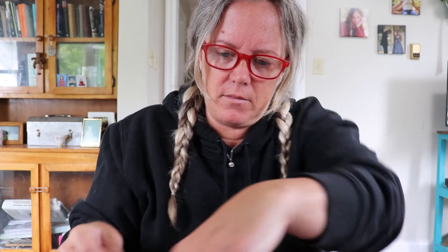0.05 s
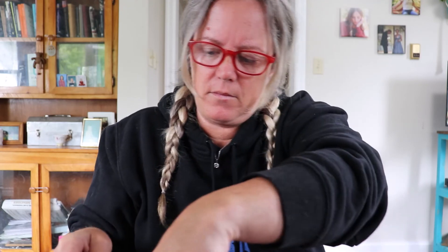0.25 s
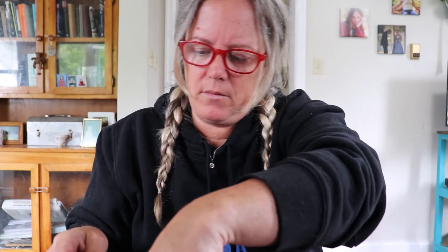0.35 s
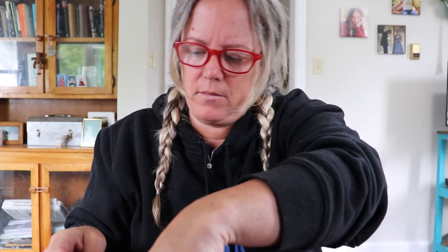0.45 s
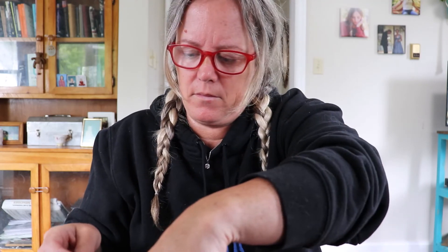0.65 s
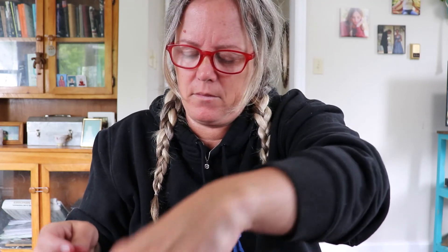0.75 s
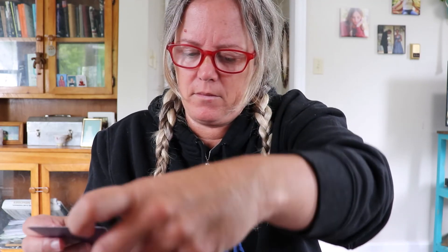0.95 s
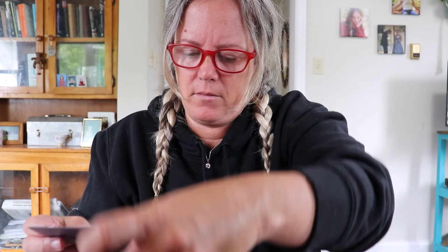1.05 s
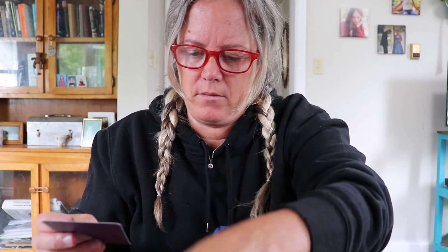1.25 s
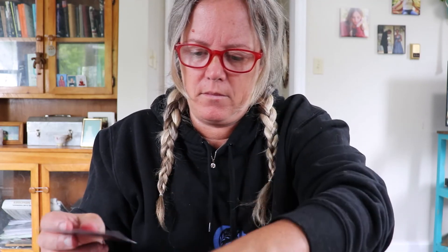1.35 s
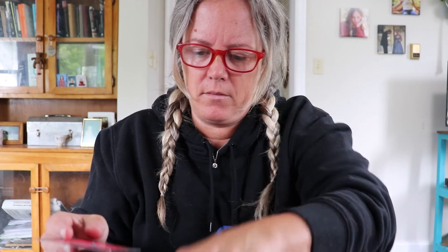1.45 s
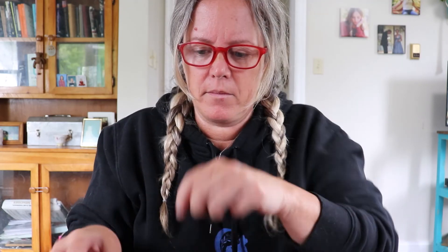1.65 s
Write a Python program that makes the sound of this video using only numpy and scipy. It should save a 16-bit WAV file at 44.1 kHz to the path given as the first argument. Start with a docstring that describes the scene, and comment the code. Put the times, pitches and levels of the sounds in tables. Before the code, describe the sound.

Playing cards are handled close to the microphone in a quiet room. A hand thumps softly on a wooden table and picks at the deck with faint clicks, then a card swishes off, snaps sharply and slides among the others.

```python
"""Playing cards snap and slide at a wooden table in a quiet room, close to a stereo microphone.
Bent edges spring free with a dispersive crack, and card rubbing on card makes friction noise,
both coloured by the card's resonances. A hand thumps the table, exciting its damped modes, and
picks at the deck; a card swishes off it, is snapped against the cards in the other hand and
slides in among them. Short reverberation and a low murmur of air lie behind."""
import sys
import numpy as np
from scipy import signal
from scipy.fft import rfft, irfft, next_fast_len
from scipy.io import wavfile

SR = 44100
rng = np.random.default_rng(int(sys.argv[2]) if len(sys.argv) > 2 else 0)


def digitize_waveform(pressure):
    """Quantize a signal to 16-bit integers and store it at the path in sys.argv[1].

    Rows of a 2-D input are taken as channels; values are limited to [-1, 1].
    """
    field = np.atleast_2d(pressure).T
    bounded = np.clip(field, -1, 1)
    quanta = np.round(bounded * 32767).astype(np.int16)
    wavfile.write(sys.argv[1], SR, quanta)


N = 74970
SIDES = np.array([[.5], [-.5]])  # splits a difference between left and right


def amp(db):
    return 10 ** (np.asarray(db) / 20)

def unit_rms(x):
    return x / np.sqrt(np.mean(x ** 2) + 1e-20)

def along(points, hz):
    """Interpolation on a logarithmic frequency axis."""
    freqs, values = np.transpose(points)
    return np.interp(np.log(hz + 1), np.log(freqs + 1), values)

def filtered(x, response):
    """Linear filtering: the spectrum times a frequency response."""
    n = x.shape[-1]
    size = next_fast_len(2 * n)
    return irfft(rfft(x, size) * response(np.fft.rfftfreq(size, 1 / SR)), size)[..., :n]

def add(out, start_s, x):
    """Superposition of x on out from start_s."""
    part = out[..., round(start_s * SR):][..., :x.shape[-1]]
    part += x[..., :part.shape[-1]]

def slope(hz, db_per_octave, above_hz):
    """Power-law gain, pivoting at 4 kHz."""
    return amp(db_per_octave * np.log2(np.maximum(hz, above_hz) / 4000))

def spread(pair, coherence):
    """Mid-side mixing gives two independent signals a set coherence."""
    angle = np.arccos(np.clip(coherence, -1, 1)) / 2
    mid, side = pair[0] * np.cos(angle), pair[1] * np.sin(angle)
    return np.array([mid + side, mid - side])

def stereo_noise(n, coherence):
    return spread(rng.standard_normal((2, n)), coherence)

def resonance_db(hz, centre_hz, width_hz, peak_db):
    """A resonance as a Lorentzian hump in dB."""
    return peak_db / (1 + (2 * (hz - centre_hz) / width_hz) ** 2)

def minimum_phase(gain):
    """Causality: a response with these gains that rings only after the blow."""
    cepstrum = irfft(np.log(np.maximum(gain, 1e-6)))
    half = len(cepstrum) // 2
    return np.exp(rfft(np.concatenate([cepstrum[:1], 2 * cepstrum[1:half], np.zeros(half)])))


# spectrum of the room's air: frequency_hz, level_db
AIR_SPECTRUM = [(20, -9.5), (50, 2.5), (70, -12), (95, 0.5), (135, -8.5), (190, -18), (275, 0.5),
                (350, -10.5), (500, -12.5), (1000, -18), (2000, -20), (4000, -26), (8000, -29.5),
                (12000, -34.5), (16000, -40)]
# left-right likeness of the room's sound: frequency_hz, coherence
ROOM_COHERENCE = [(30, 0.87), (300, 0.95), (700, 0.54), (2000, 0.073), (10000, 0.03)]
def room_tone(level_db=-46.5):
    """Stationary noise in a diffuse field: a coherent low murmur and a faint incoherent hiss."""
    hz = np.fft.rfftfreq(N, 1 / SR)
    noise = spread(rfft(rng.standard_normal((2, N))), along(ROOM_COHERENCE, hz))
    return amp(level_db) * unit_rms(irfft(noise * amp(along(AIR_SPECTRUM, hz)), N))


# reverberation time: frequency_hz, t60_s
ROOM_DECAY = [(150, 0.3), (1000, 0.56), (4000, 0.48), (9000, 0.47), (15000, 0.14)]
def reverberation(x, delay_s=.006):
    """Wall reflections decay exponentially, fastest in the high treble."""
    hz, t, noise = signal.stft(rng.standard_normal((2, SR // 2)), SR, nperseg=256)
    noise = spread(noise, along(ROOM_COHERENCE, hz)[:, None])
    decay = amp(-60 * t / along(ROOM_DECAY, hz)[:, None])
    tail = signal.istft(noise * decay, SR, nperseg=256)[1]
    delayed = np.pad(x.mean(axis=0), (round(delay_s * SR), 0))
    return signal.fftconvolve(delayed[None], tail / np.linalg.norm(tail[0]), axes=1)[:, :N]


# modes of the table top: pitch_hz, level_db, t60_s
WOOD_MODES = [(68.2, -21.5, 0.48), (133, -7.5, 0.17), (174, -2.5, 0.055), (203.4, -6.5, 0.14),
              (234.3, 3.5, 0.06), (314.4, -5, 0.12), (396.3, -15, 0.2), (513.4, -27.5, 0.33),
              (589, -9.5, 0.11), (760, -4.5, 0.055), (766, -25, 0.066), (919, -17.5, 0.056),
              (1167, -24.5, 0.17)]
# spectrum of its dense upper modes: frequency_hz, level_db
DENSE_SPECTRUM = [(250, -30), (450, 1), (800, -7), (1300, -7), (2200, -8), (5000, -33), (16000, -60)]
# blows on the top: start_s, level_db, contact_s, heave_hz
TABLE_BLOWS = [(.2212, -11, 0.00072, 187), (0.297, -31, 0.0014, 135), (.362, -31, 0.00025, 142),
               (0.44, -32, 0.0011, 132), (0.458, -25.5, 0.00085, 133), (0.475, -33.5, 0.00041, 137),
               (0.4909, -22, 0.0013, 199), (0.6371, -37, .0002, 413), (1.282, -31, 0.0013, 285),
               (1.329, -28.5, 0.0026, 208), (1.356, -25.5, 0.001, 150), (1.374, -34, 0.0027, 109)]
def table_knocks(heave_s=.0035, ring_rise_s=.0066, dense_t60_s=.19, right_lead_s=.00013):
    """Impact excitation: a blow heaves the top and rings its modes; longer contact dulls them."""
    out, t = np.zeros((2, N)), np.arange(SR // 2) / SR
    for start_s, level_db, contact_s, heave_hz in TABLE_BLOWS:
        lowpass = lambda hz: 1 / (1 + (hz * contact_s) ** 2)
        modes = sum(amp(db + rng.normal(0, 1) - 60 * t / t60) * np.sin(2 * np.pi * hz * t) * lowpass(hz)
                    for hz, db, t60 in WOOD_MODES)
        noise = stereo_noise(len(t), coherence=.17)
        dense = unit_rms(filtered(noise, lambda hz: amp(along(DENSE_SPECTRUM, hz))))
        upper = filtered(dense, lowpass) * amp(-18.5 - 60 * t / dense_t60_s)
        ring = (amp(-1) * modes + upper) * (1 - np.exp(-t / ring_rise_s))
        heave = np.sin(2 * np.pi * heave_hz * t) * t / heave_s * np.exp(1 - t / heave_s)
        add(out, start_s, amp(level_db) * (ring + amp(-3) * heave))
    # the right microphone is nearer
    return filtered(out, lambda hz: np.exp(-2j * np.pi * hz * SIDES * right_lead_s))


# modes of a held card: pitch_hz, width_hz, lift_db
CARD_RESONANCES = [(1980, 87, -1.5), (2750, 120, 3.5), (3070, 43, 3.5), (7100, 84, 0.5), (7380, 200, 5),
                   (9340, 370, 3)]
def card_ring_db(hz):
    """Modal response: each resonance of the card lifts a narrow band."""
    return sum(resonance_db(hz, *mode) for mode in CARD_RESONANCES)


# spectrum of card rubbing on card: frequency_hz, level_db
FRICTION_SPECTRUM = [(200, -0.5), (700, -8), (1500, -5), (2300, -0.5), (3500, 0), (5500, 1), (7200, -1),
                     (10000, -4), (13000, -7), (16000, -13.5)]
# strokes: fastest_s, level_db, rise_s, fall_s, tilt_db_per_octave, left_over_right_db, sing_hz, sing_db
STROKES = [(0.052, -46.5, 0.025, 0.018, 3, 1, 8500, 1), (0.113, -53, 0.032, 0.047, 0, 0, 10700, 7),
           (.162, -48.5, 0.016, 0.011, 7, 3, 10700, 6), (.255, -56, 0.023, 0.022, -1, 2, 6000, 7),
           (0.306, -46, 0.011, 0.028, -5.5, -0.5, 4170, -3),
           (0.48, -39.5, 0.023, 0.027, -7.5, -0.5, 4870, 5), (.738, -46.5, 0.017, 0.06, 3, 1, 10100, -1),
           (0.804, -38, 0.022, 0.025, 0, 1, 2900, 9.5), (0.836, -36.5, 0.026, 0.032, 3.5, 0.5, 7000, 0),
           (1.0, -53.5, 0.18, 0.055, 4, .5, 3000, 9), (1.235, -57, 0.018, 0.054, 2, 0, 9000, 0),
           (1.292, -43, 0.0054, 0.015, -4.5, -5, 1910, 11), (1.338, -34, 0.0096, 0.027, -1, 2.5, 9500, 9),
           (1.379, -31, 0.025, 0.045, 0, 2, 7030, 2), (1.42, -32.5, 0.012, 0.03, -0.5, 0.5, 2860, 8.5),
           (1.453, -40, 0.016, 0.045, -0.5, -0.5, 2990, 5)]
def card_slides(catch_db=1.37, catches_per_s=560, sing_q=10):
    """Sliding friction: finely catching noise follows each stroke's speed and sings at one pitch."""
    out, t = np.zeros((2, N)), np.arange(N) / SR
    hz = np.fft.rfftfreq(N, 1 / SR)
    card_db = along(FRICTION_SPECTRUM, hz) + card_ring_db(hz)
    for fastest_s, level_db, rise_s, fall_s, tilt, pan_db, sing_hz, sing_db in STROKES:
        progress = (t - fastest_s) / np.where(t < fastest_s, rise_s, fall_s)
        speed = np.exp(1 - np.sqrt(1 + 2 * progress ** 2))
        catching = amp(catch_db * np.interp(t * catches_per_s, np.arange(N), rng.standard_normal(N)))
        friction = stereo_noise(N, coherence=.037) * catching
        note_db = resonance_db(hz, sing_hz, sing_hz / sing_q, sing_db)
        colour = amp(card_db + note_db) * slope(hz, tilt, above_hz=910)
        rub = irfft(rfft(friction) * colour, N)
        out += amp(level_db + SIDES * pan_db) * speed * unit_rms(rub)
    return out


# the card's path from the deck to the other hand: time_s, left_lead_s
CARD_PATH = [(.4, 0.000027), (1.35, 0.000093)]
# stereo balance of a snap: frequency_hz, left_over_right_db
SNAP_BALANCE = [(1200, 2.5), (2500, -2.5), (4400, -1.5), (8000, 4.5), (12000, 10)]
def placed(snap, time_s, pan_db):
    """Time and level differences: a snap arrives first on the left, coloured differently each side."""
    lead_s = np.interp(time_s, *np.transpose(CARD_PATH))
    balance = lambda hz: amp(SIDES * (pan_db + along(SNAP_BALANCE, hz)))
    return filtered(snap, lambda hz: balance(hz) * np.exp(2j * np.pi * hz * SIDES * lead_s))


# spectrum of a snapping edge: frequency_hz, level_db
SNAP_SPECTRUM = [(200, -12), (750, -3.5), (1000, -5), (1500, -4.5), (2100, -2), (3100, 1), (3700, -0.5),
                 (4700, 3.5), (5600, -0.5), (6500, 2), (9800, -2.5), (12500, -9), (16000, -16)]
# a card is damped on the deck and rings when lifted: time_s, resonance_scale
CARD_FREEDOM = [(.5, 0.13), (1.25, 1.1)]
# edges letting go: start_s, level_db, decay_s, tilt_db_per_octave, left_over_right_db, pitch_hz
EDGE_RELEASES = [(.2225, -37, 0.0066, -5.5, -3, 1530), (0.3007, -44, 0.0055, -5.5, -1, 4100),
                 (.3625, -40, 0.0026, -7, 4.5, 810), (0.4379, -28, 0.0011, 0, -5, 1100),
                 (0.4449, -39, 0.0025, -4.5, 15, 4200), (0.4736, -37.5, 0.0016, -3.5, -9, 4800),
                 (0.4911, -31, 0.0031, -10.5, 0, 3970), (0.6361, -25.5, 0.00086, -1, -4.5, 5270),
                 (0.6378, -32, 0.0022, -6.5, 3.5, 1124), (0.64, -37.5, 0.0078, 3, -2, 3000),
                 (0.797, -32, 0.0049, -0.5, 2, 2950), (.823, -31, 0.0071, -2, 2, 2140),
                 (.845, -38.5, 0.012, -9, 2.5, 1130), (1.02, -43.5, 0.0047, -4.5, 2, 2900),
                 (1.2792, -27.5, 0.0016, -6, 2.5, 3120), (1.2808, -25.5, 0.0027, -8.5, -3.5, 1250),
                 (1.284, -36, 0.0071, -12, 1, 1710), (1.2955, -38, 0.0032, -6, 4, 1930),
                 (1.3199, -36.5, 0.0033, -4.5, -16.5, 3200), (1.347, -10, 0.0018, 0, -3.5, 3110),
                 (1.3541, -19, 0.0013, -2, -10.5, 5750), (1.356, -11.5, 0.0014, 0, -4.5, 1940),
                 (1.3602, -7, 0.0016, 2, -4, 1910), (1.3675, -25, 0.0022, -0.5, -16, 2900)]
def card_snaps(rise_s=.00008, bass_delay_s=.00101, dispersion_hz=3730, edge_q=9.1, edge_db=11):
    """Bending-wave dispersion: a bent edge lets go with a crack, its treble ahead of its bass."""
    out, pad_s = np.zeros((2, N)), .005
    t = np.maximum(np.arange(SR // 16) / SR - pad_s, 0)
    for start_s, level_db, decay_s, tilt, pan_db, pitch_hz in EDGE_RELEASES:
        envelope = (1 - np.exp(-t / rise_s)) * np.exp(-t / decay_s)
        burst = stereo_noise(len(t), coherence=.56) * envelope
        freedom = np.interp(start_s, *np.transpose(CARD_FREEDOM))

        def response(hz):
            card_db = along(SNAP_SPECTRUM, hz) + freedom * card_ring_db(hz)
            note_db = resonance_db(hz, pitch_hz, pitch_hz / edge_q, edge_db)
            colour = amp(card_db + note_db) * slope(hz, tilt, above_hz=1360)
            phase_cycles = bass_delay_s * dispersion_hz * (np.exp(-hz / dispersion_hz) - 1)
            return minimum_phase(colour) * np.exp(2j * np.pi * phase_cycles)

        crack = unit_rms(filtered(burst, response)) * np.std(envelope) / envelope.max()
        add(out, start_s - pad_s, placed(amp(level_db) * crack, start_s, pan_db))
    return out


def scene():
    """Superposition of direct sound, reverberation and room tone."""
    cards, wood = card_snaps() + card_slides(), table_knocks()
    return cards + wood + reverberation(amp(-8.5) * cards + amp(-10.5) * wood) + room_tone()

def record(dry):
    """Band limiting: a second-order high-pass thins the deep bass; a sharp cutoff ends the treble."""
    low_cut_hz, top_hz = 49, 16200
    return filtered(dry, lambda hz: (hz < top_hz) * (1j * hz / (low_cut_hz + 1j * hz)) ** 2)


dry = scene()
out = record(dry)
digitize_waveform(out)
```